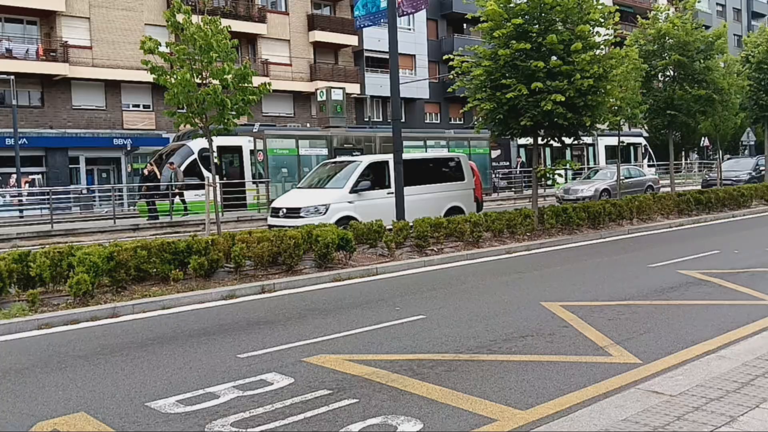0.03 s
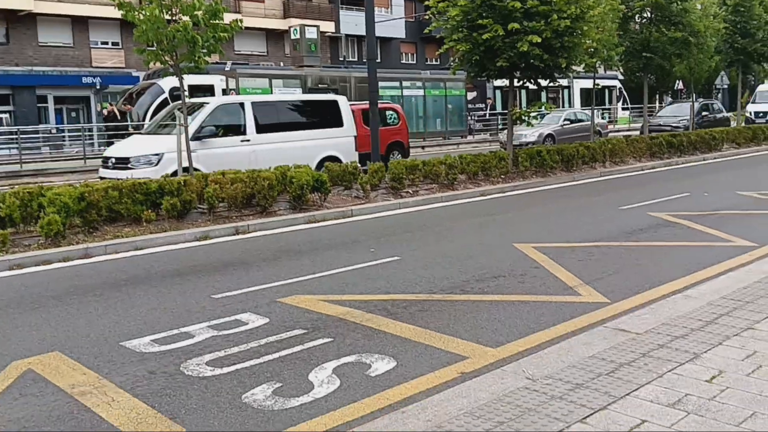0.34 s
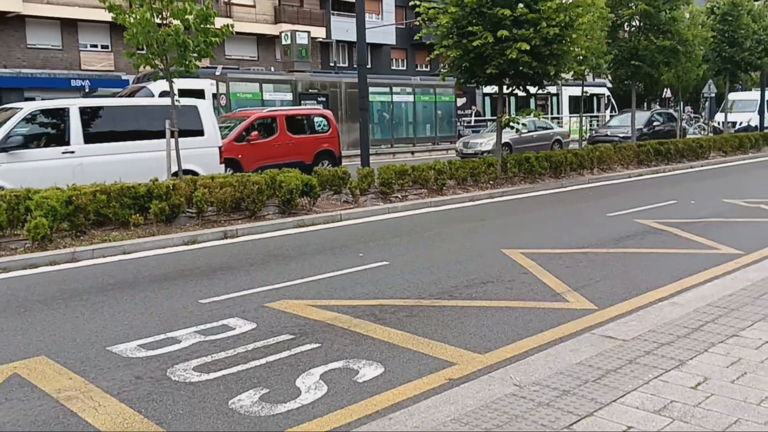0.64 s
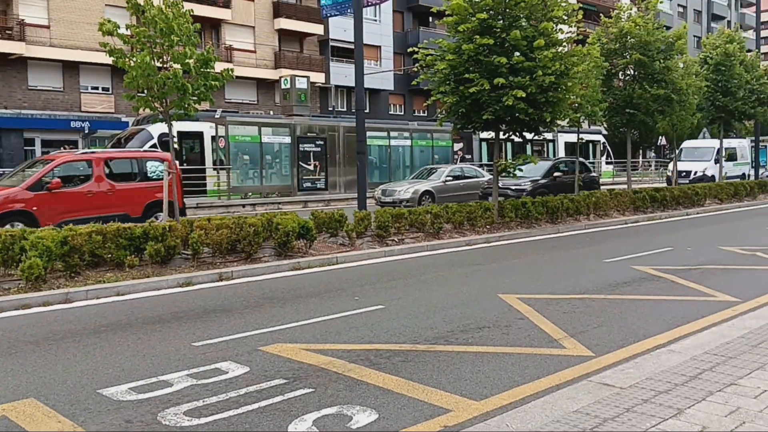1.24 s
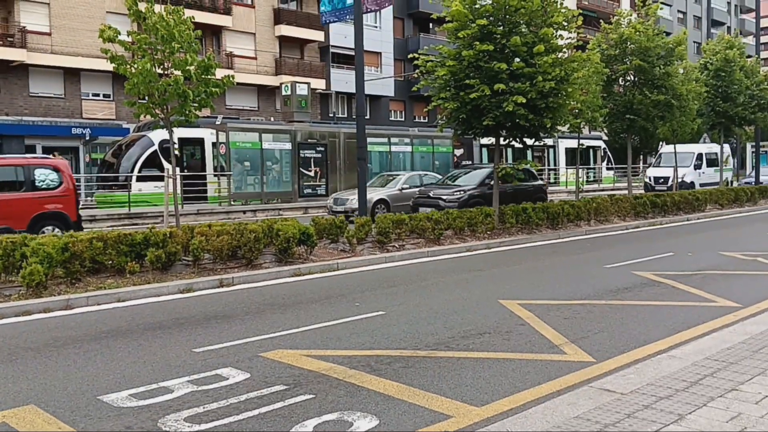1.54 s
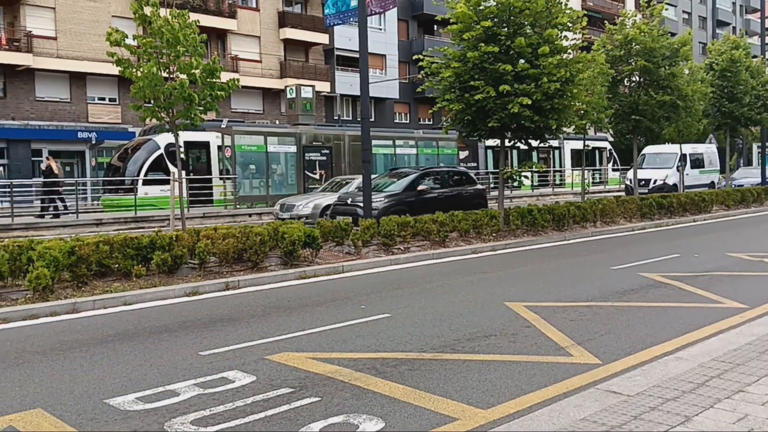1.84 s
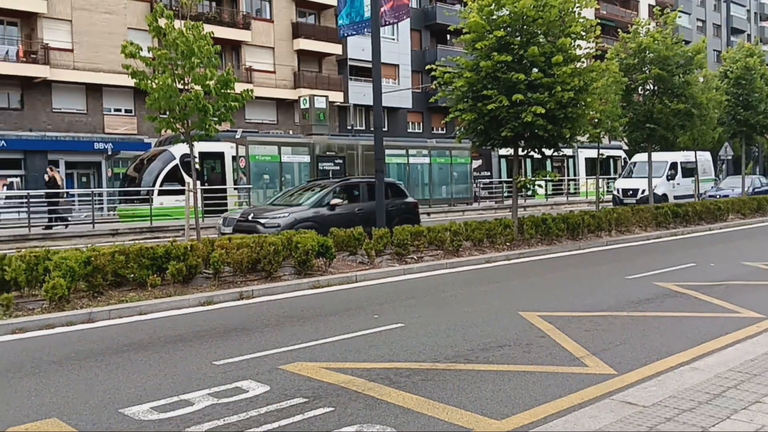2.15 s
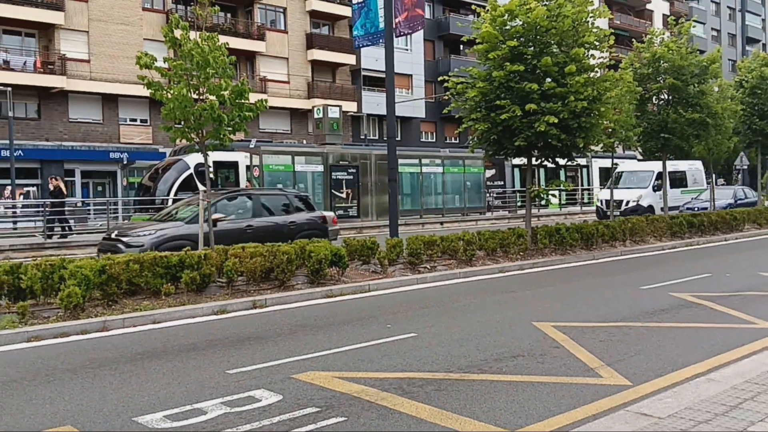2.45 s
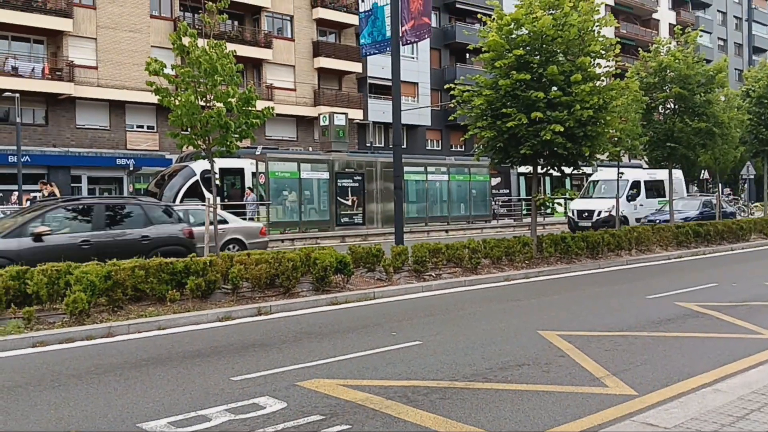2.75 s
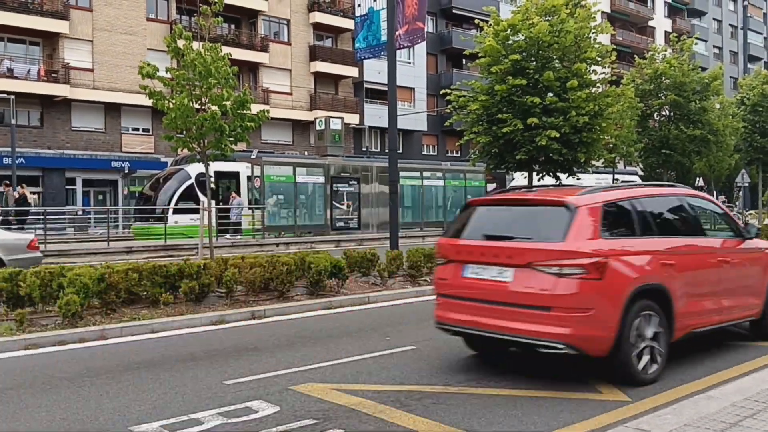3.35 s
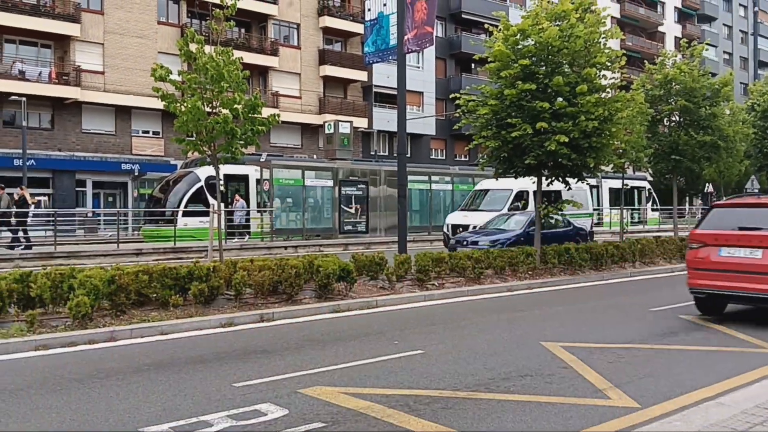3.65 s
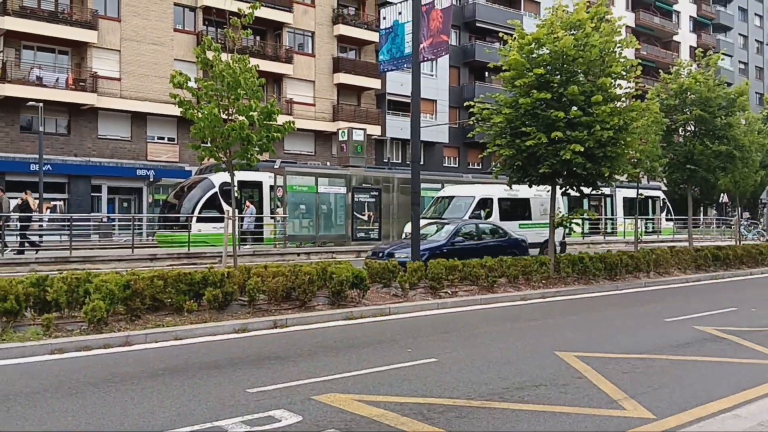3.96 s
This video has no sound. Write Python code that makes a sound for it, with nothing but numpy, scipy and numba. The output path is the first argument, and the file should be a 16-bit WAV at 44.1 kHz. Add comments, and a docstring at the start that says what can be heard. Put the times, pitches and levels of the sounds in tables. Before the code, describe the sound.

A car sweeps by near kerbside microphones, its tyres roaring and hissing before easing away. Earlier, a quick ratchet-like ticking sounds on the left, while cars and vans roll along the far lane with a low engine drone.

```python
"""A city street, from the kerb, on a spaced pair of microphones. A car sweeps by 2.8 m away, front axle
then rear, with tyre roar, hiss, crackling grit and short swishes. Narrow bands of noise swell and fade.
Vans and cars roll along the far lane over an engine drone and a low rumble.
As the sound fades in, a brief ratchet-like ticking is heard on the left."""
import sys
import numpy as np
from scipy import signal
from scipy.fft import rfft, irfft
from scipy.io import wavfile
from scipy.ndimage import map_coordinates
from numba import njit

SR = 44100
rng = np.random.default_rng(int(sys.argv[2]) if len(sys.argv) > 2 else 0)


def to_wav(s):
    """Save 16-bit WAV."""
    ch = np.atleast_2d(s).T  # columns
    pcm = np.round(np.clip(ch, -1, 1) * 32767)  # PCM
    wavfile.write(sys.argv[1], SR, pcm.astype(np.int16))


N = 176400
T = np.arange(N) / SR
PASS_S, AXLE_GAP_S, SPEED_M_PER_S, DISTANCE_M = 2.8, 0.12, 11.5, 2.8   # the close car
ROAR_DB, ROAR_FALLOFF, ROAR_REARWARD_DB = -29.5, 0.74, 3
HISS_DB, HISS_FALLOFF, HISS_REARWARD_DB = -33, 1.72, -2.5
ECHO_FAR_S, ECHO_EXTRA_S, ECHO_SHARE, LEFT_ECHO_STRETCH = 0.001056, 0.00031, 0.29, 1.12

# Roar and hiss of tyres close to the kerb: (frequency [Hz], relative density [dB])
ROAR_SPECTRUM = [(150, -4), (350, -3.5), (560, -4), (850, -0.5), (1200, -3.5), (1600, -7), (2200, -15),
                 (3200, -21.5), (4500, -16.5), (6500, -21), (8300, -34), (10300, -20), (12500, -50)]
HISS_SPECTRUM = [(1200, 1), (2500, 2.5), (3600, -1), (5200, -2.5), (6600, -1.5), (8300, -9.5), (10300, -9),
                 (12500, -21), (16000, -29)]
# How alike the microphones hear the near lane: (frequency [Hz], likeness [0-1])
NEAR_LIKENESS = [(200, 0.92), (800, 0.84), (1500, 0.69), (3000, 0.74), (5000, 0.38), (8000, 0.11)]
# Lag of the left microphone as the front axle goes by: (time [s], lag [ms])
NEAR_LAG = [(2.5, 1.4), (2.7, 1.3), (2.85, 1.04), (3.0, 0.88), (3.3, 0.72), (4, 0.59)]
def axle(behind_s, tread_db=1.3):
    """One close axle: roar thrown rearward, hiss heard only nearby, and a sweeping road reflection."""
    along = SPEED_M_PER_S * (T - PASS_S - behind_s)
    distance = np.hypot(along, DISTANCE_M)
    near, receding = DISTANCE_M / distance, along / distance
    roar_gain = near ** ROAR_FALLOFF * from_db(ROAR_DB + ROAR_REARWARD_DB * receding)
    hiss_gain = near ** HISS_FALLOFF * from_db(HISS_DB + HISS_REARWARD_DB * receding)
    roar = noise(ROAR_SPECTRUM, NEAR_LIKENESS) * roar_gain
    hiss = noise(HISS_SPECTRUM, NEAR_LIKENESS) * hiss_gain
    echo_s = ECHO_FAR_S + ECHO_EXTRA_S * near
    echo = np.array([delayed(roar[0], LEFT_ECHO_STRETCH * echo_s), delayed(roar[1], echo_s)])
    tyres = (roar + ECHO_SHARE * echo + hiss) * from_db(tread_db * drift(52))
    return left_late(tyres, in_time(NEAR_LAG, behind_s)[0])


def grit(per_s=690, level_db=-42, spread_db=3, falloff=1.7, band_hz=(1500, 8800), lead_s=0.067):
    """Grit crackles under the close tyres: tiny uneven clicks, loudest near the microphones."""
    born = rng.random((2, N)) < per_s / SR
    sizes = from_db(spread_db * np.minimum(rng.exponential(1, (2, N)), 4))
    signs = rng.choice([-1, 1], (2, N))
    band = signal.butter(2, band_hz, "band", fs=SR, output="sos")
    clicks = signal.sosfilt(band, born * sizes * signs + 1e-18)
    near = DISTANCE_M / np.hypot(SPEED_M_PER_S * (T - PASS_S + lead_s), DISTANCE_M)
    return rms_one(clicks) * from_db(level_db) * near ** falloff


# Swishes at the kerb: (time [s], level [dB], half-width [s], left over right [dB])
SWISHES = [(1.36, -50, .025, -20), (1.58, -63, .03, 3), (2.155, -39, .022, -17), (2.27, -48.5, 0.058, -20),
           (2.421, -36, 0.057, -19), (2.615, -35, 0.062, -16), (2.71, -38.5, 0.029, -8),
           (2.805, -33.5, 0.029, -10), (2.905, -40, .005, -10), (2.901, -49.5, .11, -5),
           (3.05, -67, 0.046, -5), (3.28, -64, 0.063, -5)]
# Their colour: (frequency [Hz], relative density [dB])
SWISH_SPECTRUM = [(4000, 1), (6500, -2.5), (8500, -2.5), (10700, 5), (13000, -6), (16000, -9)]
def swishes(grain_db=2):
    """Short grainy swells in the top treble, mostly on the right microphone."""
    swells = sum(swell(s, db, width) * pan(side_db) for s, db, width, side_db in SWISHES)
    return noise(SWISH_SPECTRUM) * swells * from_db(grain_db * drift(250))


# Narrow bands of noise at the microphones:
# (time [s], level [dB], half-width [s], centre [Hz], bandwidth [Hz], left over right [dB])
NOISE_BANDS = [(1.1, -49.5, 0.17, 4550, 350, 3.5), (1.65, -44, .25, 6730, 900, 12),
               (2.05, -38, 0.31, 1390, 280, -3), (2.5, -45.5, 0.1, 2860, 260, -3),
               (2.57, -31.5, 0.095, 694, 260, 3), (2.66, -35, 0.032, 5900, 2200, -3),
               (2.85, -39, 0.087, 5150, 450, -4), (3.0, -32.5, .075, 4850, 1700, 12),
               (3.3, -30.5, 0.21, 1000, 378.9, -0.5), (3.5, -34, 0.27, 870, 110, 4)]
# How alike the microphones hear them: (frequency [Hz], likeness [0-1])
BAND_LIKENESS = [(700, 0.72), (3000, 0.72), (5000, 0.22)]
def swelling_bands():
    """Narrow bands of noise swell and fade as the car comes and goes.
    The two far to the left are hiss ringing in that microphone, lower as the car passes."""
    out, hz = np.zeros((2, N)), np.geomspace(200, 16000, 300)
    for s, db, width, centre_hz, band_hz, side_db in NOISE_BANDS:
        band_db = -20 * np.log10(1 + ((hz * hz - centre_hz ** 2) / (hz * band_hz)) ** 2)
        out += noise(np.transpose([hz, band_db]), BAND_LIKENESS) * swell(s, db, width) * pan(side_db)
    return left_late(out, in_time(NEAR_LAG)[0])


# Ticks off to the left: (time [s], level [dB], centre [Hz], relative top treble [dB])
TICKS = [(0.5214, -22.5, 5500, -18), (0.5462, -30, 6500, -16), (0.5679, -33, 7350, -17),
         (.5925, -34, 7550, -16), (0.615, -34, 7260, -18), (.640, -33, 7050, -25), (0.665, -34, 7500, -25),
         (0.689, -36, 7050, -25), (.708, -40, 7000, -32), (0.749, -34.5, 7250, -27)]
# Colour of one tick: (frequency [multiple of the centre], relative density [dB])
TICK_SPECTRUM = [(.3, -18), (.55, -1.5), (.9, 1.5), (1.2, 2.5), (1.55, -16.5)]
def ratchet(attack_s=0.0004, decay_s=0.0053, top_hz=14500, left_db=17):
    """A quick run of dry ticks on the left microphone, the first lower and harder."""
    out = np.zeros((2, N))
    for s, db, hz, top_db in TICKS:
        age = np.maximum(T - s, 0)
        envelope = (1 - np.exp(-age / attack_s)) * np.exp(-age / decay_s)
        spectrum = [(k * hz, band_db) for k, band_db in TICK_SPECTRUM] + [(top_hz, top_db)]
        out += from_db(db) * envelope * noise(spectrum)
    return out * pan(left_db)


# Tyres from across the street: (time [s], level [dB])
FAR_LEVEL = [(.6, -33), (1, -34), (1.5, -32), (2.05, -29.5), (2.5, -27.5), (3.1, -33), (4, -30.5)]
# Their colour at that distance: (frequency [Hz], relative density [dB])
FAR_SPECTRUM = [(200, -0.5), (480, -3), (650, -4), (850, 1.5), (1100, -1), (1450, -4), (1900, -9),
                (3200, -14), (4400, -17), (5500, -23), (7000, -22.5), (8400, -25), (10300, -23.5),
                (12000, -43.5), (16000, -77)]
# How alike the microphones hear them: (frequency [Hz], likeness [0-1])
FAR_LIKENESS = [(200, 0.96), (550, 0.68), (1000, 0.53), (1450, 0.57), (2000, 0.43), (2600, 0.54),
                (3500, 0.098), (9000, .05)]
# Their lag at the left microphone: (time [s], lag [ms])
FAR_LAG = [(.7, 1.36), (1.05, 1.31), (1.5, 1.335), (2.2, 1.39)]
def far_lane(flutter_db=1.06):
    """Tyres of the queue of vehicles roll along the far side of the street."""
    tyres = left_late(noise(FAR_SPECTRUM, FAR_LIKENESS), in_time(FAR_LAG)[0])
    return tyres * from_db(in_time(FAR_LEVEL)[0] + flutter_db * drift(8.1))


# Engine from the kerb: (time [s], firing rate [Hz], relative firing level [dB], relative octave [dB])
ENGINE = [(0.6, 65.3, -41, -39), (0.65, 64.9, -41, -44), (0.85, 62.2, -40, -37), (0.96, 65.1, -28, -40.5),
          (1.34, 64.63, -42, -34.5), (1.44, 63.34, -37, -37.5), (2.0, 60.87, -29, -31.5),
          (2.54, 60.8, -30.5, -40.5), (2.57, 60.6, -19, -38), (2.59, 60.97, -16, -34),
          (2.88, 61, -21.5, -26.5), (2.95, 61.06, -19, -36), (3.05, 59.35, -31, -28.5),
          (3.15, 59.38, -28, -34.5), (3.22, 60.14, -23, -29.5), (3.32, 61.0, -28.5, -32.5),
          (3.92, 60.72, -33.5, -35), (4.0, 64.3, -38, -39)]
# Its weaker orders: (frequency [multiple of the firing rate], level against the octave column [dB])
ENGINE_ORDERS = [(2.5, -14), (3, -14), (4, -12), (5, -16)]
# A second engine in the street: (time [s], firing rate [Hz], level [dB])
SECOND_ENGINE = [(2.9, 73, -62), (3.3, 72.5, -32), (3.7, 71.24, -31), (4, 71, -32.5)]
def engines(firing_trim_db=-2.5, octave_trim_db=-0.5, flutter_db=1.06, jitter=0.0076):
    """Firing tones with a little flutter, and a second engine beating against them."""
    hz, firing_db, octave_db = in_time(ENGINE)
    phase = 2 * np.pi * np.cumsum(hz * (1 + jitter * drift(8.3))) / SR
    partials = [(1, firing_db + firing_trim_db), (2, octave_db + octave_trim_db)]
    partials += [(k, octave_db + db) for k, db in ENGINE_ORDERS]
    first = sum(from_db(db + flutter_db * drift(7.4)) * np.sin(k * phase + rng.uniform(0, 2 * np.pi))
                for k, db in partials)
    second_hz, second_db = in_time(SECOND_ENGINE)
    second = from_db(second_db) * np.sin(2 * np.pi * np.cumsum(second_hz) / SR)
    drone = np.sqrt(2) * (first + second)
    return bass_late([drone, drone])


# Street rumble and body drone at the kerb: (time [s], level [dB])
RUMBLE_LEVEL = [(.6, -37), (1.1, -38), (1.6, -38.5), (2.3, -38.5), (2.6, -35), (3.0, -39), (3.6, -35),
                (4, -37.5)]
BODY_LEVEL = [(.6, -34.5), (1.1, -32), (1.7, -37), (2.3, -34), (2.8, -32), (3.2, -33), (3.5, -36), (4, -37)]
# Their colours: (frequency [Hz], relative density [dB])
RUMBLE_SPECTRUM = [(24, -12), (37, -3.5), (48, -3.5), (62, -0.5), (80, -6), (105, -8.5)]
BODY_SPECTRUM = [(100, 0), (140, 0), (180, -3), (230, -1), (300, 0), (360, -5.5), (450, -12.5), (800, -35)]
def rumble():
    """Deep rumble of all the traffic, and the hollow drone of bodies and wheels on the road."""
    deep = noise(RUMBLE_SPECTRUM, NEAR_LIKENESS) * from_db(in_time(RUMBLE_LEVEL)[0])
    body = noise(BODY_SPECTRUM, NEAR_LIKENESS) * from_db(in_time(BODY_LEVEL)[0])
    return bass_late(deep + body)


# Resonance of the left microphone: (time [s], corner [Hz], square root of damping [ratio])
LEFT_PORT = [(.6, 7160, .36), (1.3, 7120, 0.36), (1.9, 7430, 0.43), (2.25, 7300, 0.61), (2.55, 7400, 0.53),
             (2.8, 6887, 0.43), (3.0, 6250, 0.54), (3.1, 5240, 0.6), (3.22, 4640, 0.69), (4, 4713, 0.75)]
def left_port(pair):
    """The left microphone rings and cuts off lower as the traffic swings round."""
    hz, root_damping = in_time(LEFT_PORT)
    g = np.tan(np.pi * hz / SR)
    ringing = moving_lowpass(pair[0], g, np.maximum(root_damping, .05) ** 2)
    return np.array([moving_lowpass(ringing, g, np.full(N, np.sqrt(2))), pair[1]])


@njit
def moving_lowpass(x, g, damping):
    """Resonant two-pole low-pass whose corner (set by g) and damping move."""
    out, band, low = np.zeros(len(x)), 0., 0.
    for i in range(len(x)):
        b = (band + g[i] * (x[i] - low)) / (1 + g[i] * (g[i] + damping[i]))
        out[i] = low + g[i] * b
        band, low = 2 * b - band, 2 * out[i] - low
    return out


def left_late(pair, ms):
    """The sound reaches the left microphone later."""
    return np.array([delayed(pair[0], ms / 1000), pair[1]])


def bass_late(pair, lag_share=0.81):
    """Reflections shorten the lag of the bass at the left microphone."""
    return left_late(pair, lag_share * in_time(NEAR_LAG)[0])


def delayed(x, seconds):
    """Read a sound through a moving delay."""
    return map_coordinates(x, [np.arange(N) - seconds * SR], order=3, mode="mirror")


def pan(db):
    """Left and right gains for a level difference, at constant power."""
    return rms_one(from_db(np.array([[db], [-db]]) / 2))


def noise(spectrum, likeness=None):
    """Stereo noise of a given colour and left-right likeness, falling steeply past its ends; rms 1."""
    hz = np.maximum(np.arange(N // 2 + 1) * SR / N, 1)
    ends = np.minimum(hz / spectrum[0][0], 1) ** 3 * np.minimum(spectrum[-1][0] / hz, 1) ** 3
    alike = np.clip(at_hz(likeness, hz), 0, 1) if likeness else 0
    mid, side = rfft(rng.standard_normal((2, N)))
    pair = np.sqrt(1 + alike) * mid + np.sqrt(1 - alike) * side * [[1], [-1]]
    return rms_one(irfft(pair * ends * from_db(at_hz(spectrum, hz)), N))


def drift(rate_hz):
    """Slow random wander with spread 1, drawn every 40 samples."""
    pole = np.exp(-80 * np.pi * rate_hz / SR)
    white = rng.standard_normal(N // 40 + 2002)
    slow = signal.lfilter([1], [1, -2 * pole, pole * pole], white)[2000:]
    return np.interp(np.arange(N) / 40, np.arange(len(slow)), rms_one(slow))


def swell(peak_s, db, width_s):
    """A bell-shaped rise and fall in gain."""
    return from_db(db) * np.exp(-.5 * ((T - peak_s) / width_s) ** 2)


def in_time(rows, delay=0):
    """The columns of a curve at every sample."""
    s, *columns = np.transpose(rows)
    return [np.interp(T - delay, s, c) for c in columns]


def at_hz(points, hz):
    """Read a spectrum on a log-frequency axis."""
    point_hz, values = np.transpose(points)
    return np.interp(np.log(hz), np.log(point_hz), values)


def from_db(db):
    """Decibels to gain."""
    return 10 ** (np.asarray(db) / 20)


def rms_one(x):
    """Scale to rms 1."""
    return x / np.sqrt(np.mean(x ** 2) + 1e-20)


def scene():
    """The whole street at the two microphones."""
    tyres = far_lane() + axle(0) + axle(AXLE_GAP_S) + grit()
    return left_port(tyres) + swelling_bands() + engines() + rumble() + swishes() + ratchet()


# Opening fade on both microphones: (time [s], gain [dB])
FADE_IN = [(.374, -90), (.381, -18.5), (.42, -11.5), (.49, -4.5), (.56, -0.5), (.63, 2)]
def record(dry):
    """The sound fades in and the top is cut above 15.9 kHz."""
    faded = dry * from_db(in_time(FADE_IN)[0])
    return signal.sosfilt(signal.ellip(12, .1, 80, 15900, fs=SR, output="sos"), faded)


dry = scene()
out = record(dry)
to_wav(out)
```